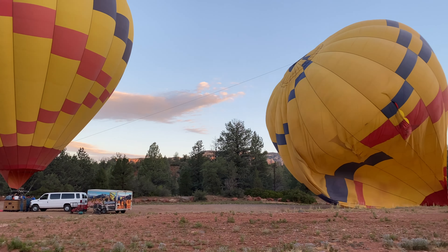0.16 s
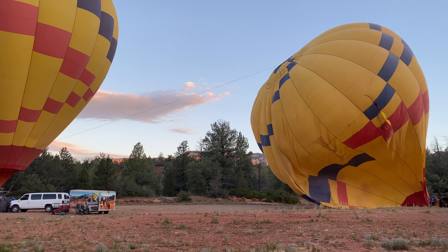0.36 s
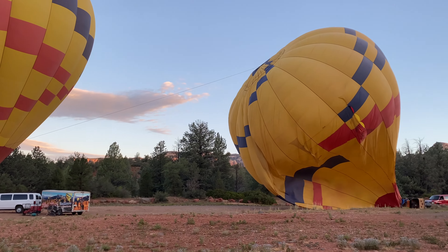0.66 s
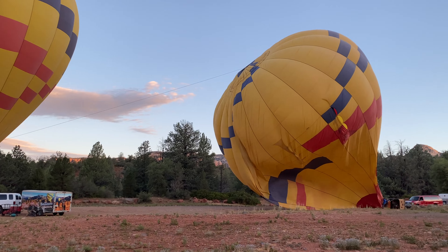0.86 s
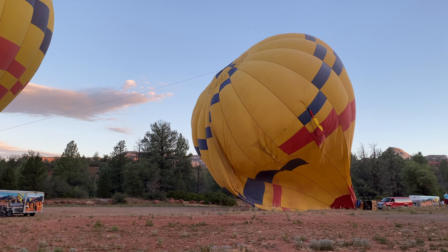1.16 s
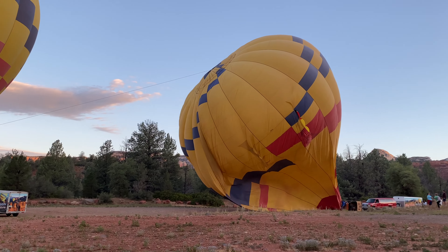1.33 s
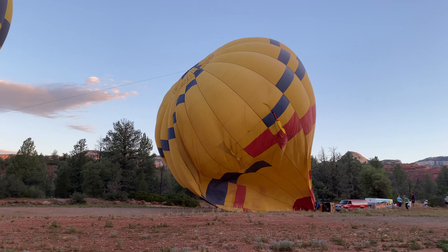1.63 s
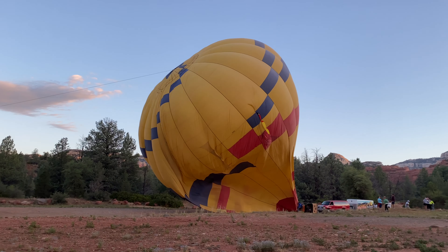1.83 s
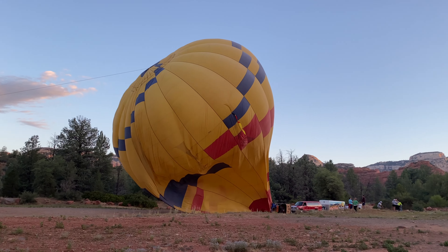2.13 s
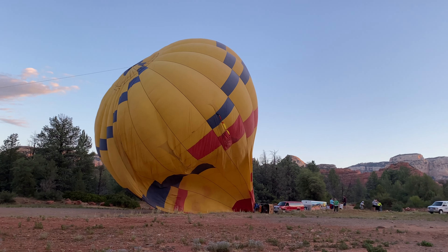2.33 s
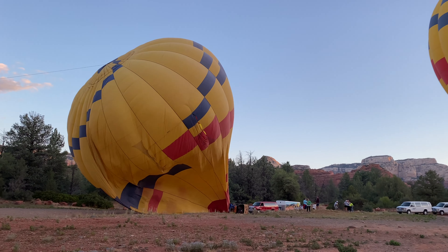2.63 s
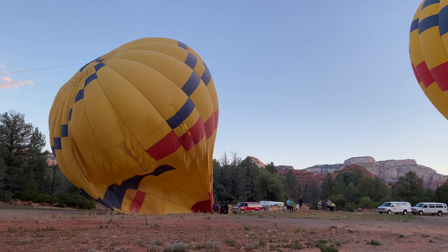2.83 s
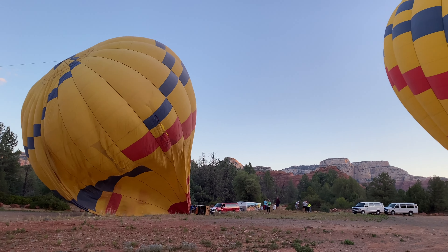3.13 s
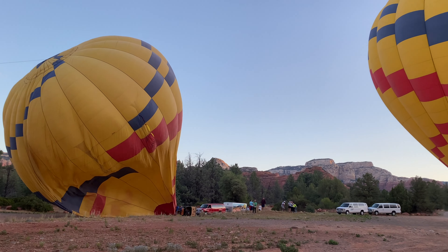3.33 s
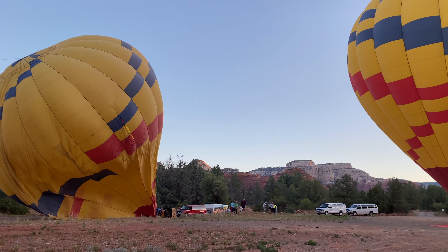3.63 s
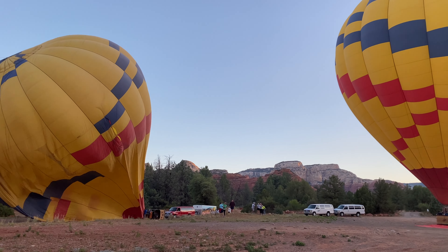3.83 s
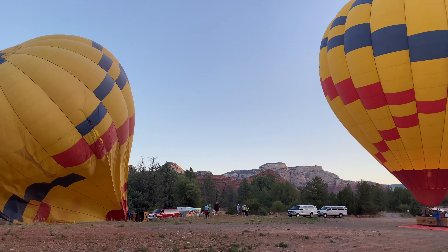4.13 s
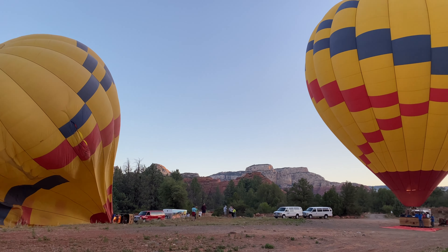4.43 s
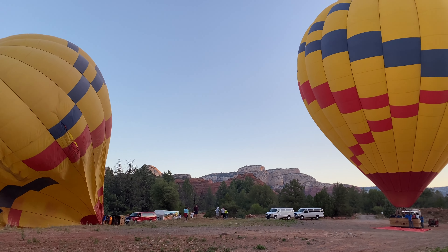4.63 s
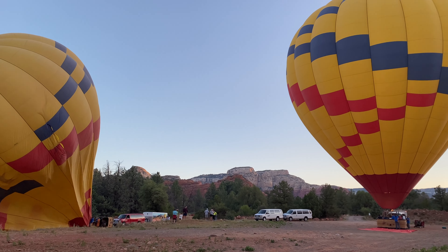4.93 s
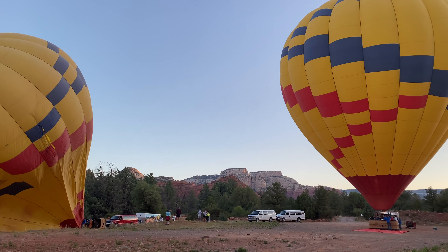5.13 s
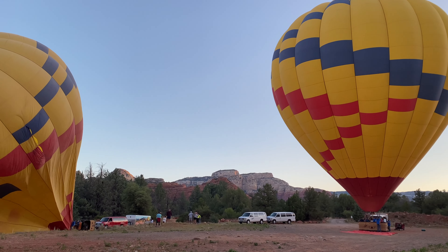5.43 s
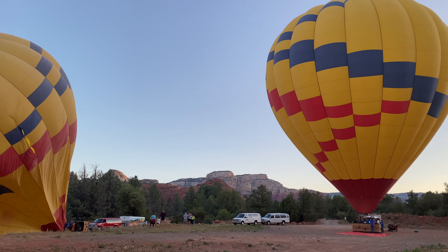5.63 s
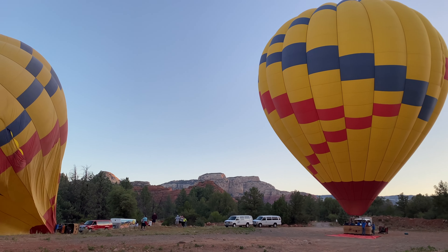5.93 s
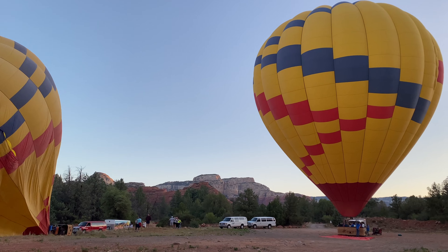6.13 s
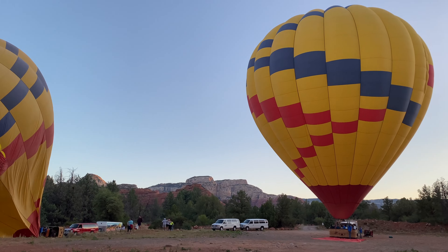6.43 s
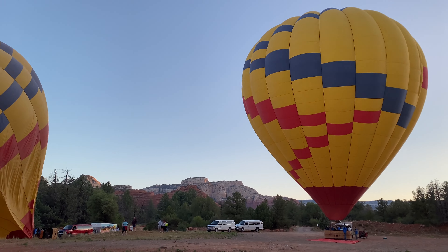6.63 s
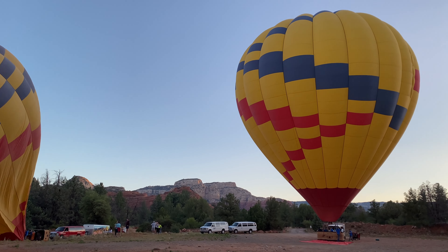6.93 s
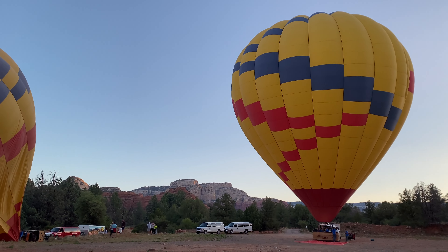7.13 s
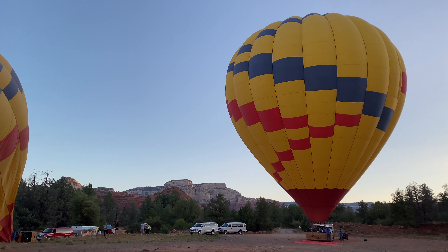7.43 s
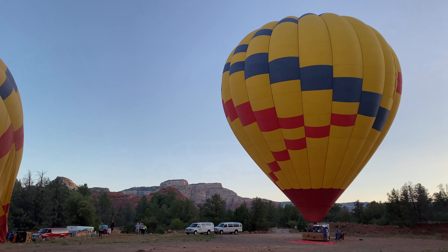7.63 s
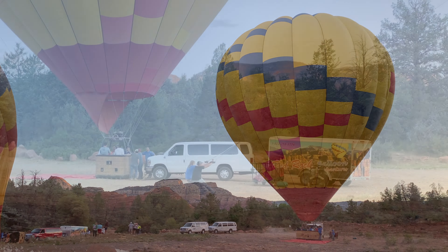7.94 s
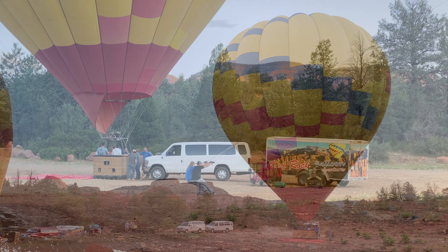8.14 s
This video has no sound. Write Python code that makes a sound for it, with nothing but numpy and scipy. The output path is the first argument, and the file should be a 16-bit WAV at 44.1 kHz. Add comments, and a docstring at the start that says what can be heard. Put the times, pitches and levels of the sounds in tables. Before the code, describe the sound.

On an open field, a small one-cylinder petrol engine throbs steadily while its inflator fan hums over rushing air. After a bit over two seconds a propane burner fires a brief deep blast, then almost at once a long one with heavy thumps, fluttering roar and hiss, easing slowly. Heard in stereo from a slowly turning camera; the sound fades at the end.

```python
"""A one-cylinder petrol engine throbs and its three-blade inflator fan hums over rushing air.
A propane burner then gives a short blast and a long one, joined for a while by a second valve.
The flame is level-evened deep noise with single thumps; the jet is a fluttering roar that eases and a
hiss whose top dulls. Engine and fan are sums of tones at multiples of their rates; the fan adds chopped noise.
Balloons are being filled on an open field, heard by a slowly turning stereo camera."""
import sys
import numpy as np
from scipy import signal
from scipy.fft import rfft, irfft
from scipy.io import wavfile
from scipy.ndimage import uniform_filter1d

SR = 44100
rng = np.random.default_rng(int(sys.argv[2]) if len(sys.argv) > 2 else 0)


def master(y):
    """Save y as 16-bit WAV."""
    cut = np.clip(np.atleast_2d(y).T, -1, 1)
    pcm = np.round(cut * 32767)  # scale
    wavfile.write(sys.argv[1], SR, pcm.astype(np.int16))


N = 364707
TIME_S = np.arange(N) / SR

# burner blasts, last row the second valve: (opens [s], shuts [s], rumble [dB], roar [dB], hiss [dB])
BLASTS = [(2.312, 3.25, -27, -41.5, -41), (3.29, 8.3, -28.5, -39.5, -41), (4.37, 5.7, -29, -38.5, -64)]
# single large puffs of burning gas: (time [s], peak level [dB])
FLAME_PUFFS = [(2.333, -23), (2.354, -14.5), (2.418, -14.5), (2.716, -18), (2.777, -17.5), (2.937, -23),
               (3.359, -9.5), (3.43, -14), (3.6, -18), (3.779, -20), (4.052, -22), (4.195, -19),
               (4.417, -11.5), (4.486, -16.5), (4.721, -19), (4.777, -18), (4.845, -18), (4.9, -19),
               (5.071, -15.5), (5.117, -19), (5.291, -13), (5.513, -18), (5.784, -20), (5.835, -19),
               (5.95, -17.5), (6.009, -16.5), (6.637, -22), (6.721, -18.5), (7.304, -17.5), (7.364, -20),
               (7.597, -19.5)]
# surging of the flame: (time [s], rumble gain [dB])
FLAME_SURGE = [(2.5, -1), (2.75, -0.5), (2.92, 0), (3.17, -1), (3.4, -1.5), (3.62, 1.5), (3.87, 0.5),
               (4.25, 2), (4.58, 0), (4.8, 2), (5.15, 0.5), (5.4, -1), (5.6, 0), (6.03, 2), (6.25, -0.5),
               (6.9, 0), (7.37, 0.5), (7.7, 0.5), (8.1, 3)]
# relative noise spectrum of the flame: (frequency [Hz], density [dB])
RUMBLE_SPECTRUM = [(20, -16), (30, -15), (45, -8.5), (62, 0.5), (85, -1), (120, -2.5), (178, -3.5),
                   (210, -6.5), (250, -11.5), (295, -11), (340, -15), (450, -23.5), (900, -49.5)]
# relative noise spectrum of the jet's roar: (frequency [Hz], density [dB])
ROAR_SPECTRUM = [(200, -9.5), (450, -1), (700, -0.5), (1100, -1.5), (1600, -9.5), (2400, -12.5),
                 (4000, -29)]
# relative noise spectrum of the jet's hiss: (frequency [Hz], density [dB])
HISS_SPECTRUM = [(1200, 4), (2200, -0.5), (3200, 5), (4000, 5.5), (5000, 6.5), (5800, 5.5), (6600, 4.5),
                 (7500, 3), (9000, 0.5), (10500, -2.5), (12000, -4), (14000, -7)]
# relative exhaust orders: (multiple of the firing rate, level [dB])
EXHAUST_ORDERS = [(1, -41), (2, -17), (3, -15), (4, -5.5), (5, -10), (6, -3), (7, 0), (8, -6), (9, -13),
                  (10, -19), (11, -25), (12, -8.5), (13, -5), (14, -13), (15, -22.5), (16, -35), (17, -20),
                  (19, -25)]
# strongest fan tones, swelling and sinking in level: (time [s], 3rd [dB], 4th [dB], 5th [dB], 6th multiple of
# the blade rate [dB])
FAN_HUM = [(0.0, -52, -54, -67, -51), (0.35, -48, -52, -49.5, -50), (0.65, -48.5, -49.5, -52.5, -45.5),
           (1.15, -50, -51, -54, -53.5), (1.35, -51, -57, -52.5, -46.5), (1.65, -50.5, -56, -48, -53.0),
           (1.9, -52, -55.0, -56.0, -47.5), (2.1, -61, -50.5, -50.5, -64), (2.85, -53, -50, -49.5, -49),
           (3.05, -52.5, -58, -45.5, -56), (3.35, -50, -47.5, -57, -44.5), (3.5, -50, -52, -48, -47),
           (4.1, -54.5, -58.5, -57, -56), (4.3, -55.5, -50.5, -62, -58), (4.5, -58, -51, -58, -44),
           (4.75, -54, -47, -51.5, -57.5), (5.0, -45, -58.0, -50, -54.5), (5.15, -53, -56.0, -55, -44),
           (5.4, -51.5, -55, -59, -55.5), (5.55, -52, -46, -46, -44.5), (5.9, -49.0, -51, -51.5, -46),
           (6.1, -54, -46, -46, -54), (6.6, -49, -47.5, -48, -46), (6.8, -52, -48, -50, -57),
           (7.2, -53, -49, -44.5, -44), (7.55, -50.5, -50.5, -44.5, -48), (7.7, -51.0, -47, -55, -53),
           (7.9, -52.5, -56, -49, -48), (8.05, -53, -47.5, -58, -56), (8.25, -56, -48, -48, -58.5)]
# upper fan tones: (multiple of the blade rate, level before the FAN_TURN gain [dB])
UPPER_FAN_TONES = [(7, -67.5), (8, -56.7), (9, -56.5), (10, -60), (11, -58), (12, -66)]
# fan as heard from the turning camera: (time [s], upper tone gain [dB], wash gain [dB])
FAN_TURN = [(0, 0, 0), (1, 2.5, -1), (2.1, 1.5, -0.5), (3, 3.5, -3), (4, 4.5, -3.5), (5.5, 6, -2),
            (6.6, 7.5, -2.5), (7.3, 8, -2.5), (8.1, 2, -1.5)]
# relative noise spectrum of the churned air: (frequency [Hz], density [dB])
WASH_SPECTRUM = [(30, -16), (80, -5), (160, -6.5), (300, -6), (450, -9), (700, -8.5), (1000, -9.5),
                 (1500, -6.5), (2200, -3.5), (3200, -13.5), (4500, -13.5), (6500, -15.5), (9000, -20),
                 (12000, -25), (14000, -30)]
# likeness of the two microphones: (frequency [Hz], coherence [0..1])
MIC_LIKENESS = [(100, 1), (270, 0.92), (600, 0.079), (1300, 0.42), (2500, 0.47), (5000, 0.82), (7000, 0.31),
                (12000, 0.037)]
# camera body shadow, sound on its right: (frequency [Hz], left minus right [dB])
SHADOW_RIGHT = [(100, -1.8), (400, -3), (850, -7), (2100, -2.5), (3200, 5), (4500, -5), (5800, -1.5),
                (6800, -5), (8500, 0)]
# camera body shadow, sound on its left: (frequency [Hz], left minus right [dB])
SHADOW_LEFT = [(100, -1), (400, -.5), (850, 2.5), (1900, -2.5), (3100, 10), (4300, 0.5), (5800, -4.5),
               (7500, 0.5), (8500, 0)]
# tone colour of the sum of the two channels, peaks and dips: (frequency [Hz], gain [dB])
SUM_COLOUR = [(3000, 0.5), (3900, -0.5), (4550, 1), (5100, 1.5), (5500, -4), (5850, -1), (6350, 2),
              (6800, 1.5), (7500, 0.5), (8250, -16.5), (9200, 0), (10500, 2.5), (12300, 0.5), (12900, -26)]
# tone colour of the difference of the two channels, peaks and dips: (frequency [Hz], gain [dB])
DIFFERENCE_COLOUR = [(500, 0), (1100, -1.5), (1800, 2), (2500, -5), (3500, 1.5), (4450, -4.5), (5800, 4.5),
                     (6700, -6), (7600, 1.5), (8500, 4), (9700, 0), (11000, -16), (12200, 0), (13300, 1.5)]
# closing fade: (time [s], gain [dB])
END_FADE = [(7.85, 0), (8.27, -7)]

# first-rush offset (negative: starts weak) decays with FLARE_S; slopes run from the valve's opening
FLARE_S = 0.3
RUMBLE_RISE_S, RUMBLE_FLARE_DB, RUMBLE_SLOPE_DB_PER_S = 0.0089, 1.5, -0.37
ROAR_RISE_S, ROAR_FLARE_DB, ROAR_SLOPE_DB_PER_S = 0.12, -1.5, -0.92
HISS_RISE_S, HISS_FLARE_DB, HISS_SLOPE_DB_PER_S = 0.19, -1.5, 0.3
RELEASE_DB_PER_S = 26  # added to the slope once the valve shuts
DULL_FROM_S, DULL_DB_PER_S = 3.53, 4.5  # top of the hiss

FIRING_HZ, EXHAUST_DB = 23.54, -32.5
EXHAUST_FADE_DB_PER_S = 0.7  # low throb only, once the camera turns away
WASH_DB = -38

# FACING_S: camera faces the sound; PORT_MS: delay between microphones for sound from the side
TURN_DEG_PER_S, FACING_S, PORT_MS = 17.6, 2.26, 0.22
BAND_EDGE_HZ = 14000


def amp(db):
    """Decibels to gain."""
    return 10 ** (np.asarray(db) / 20)


def unit(x):
    """Scales to rms 1."""
    return x / np.sqrt(np.mean(x ** 2) + 1e-20)


def curve(rows):
    """Columns of a time table, joined by straight lines."""
    s, *columns = np.transpose(rows)
    return [np.interp(TIME_S, s, column) for column in columns]


def colour(points, hz):
    """Reads a spectrum on a log-frequency axis."""
    f, value = np.transpose(points)
    return np.interp(np.log(hz + 1), np.log(f), value)


def drift(top_hz):
    """Random motion of rms 1: twenty sines no faster than top_hz."""
    t = np.arange(0, N / SR + .01, .004)
    rates_hz = top_hz * rng.uniform(0.0987, 1, 20)
    waves = sum(np.sin(2 * np.pi * (hz * t + rng.random())) for hz in rates_hz)
    return np.interp(TIME_S, t, unit(waves))


def spectra(x, size):
    """Short-time spectra: Hz, s, (channel, bin, frame)."""
    return signal.stft(x, SR, nperseg=size, noverlap=size * 3 // 4)


def waveform(z, size):
    """Short-time spectra back to sound."""
    return signal.istft(z, SR, nperseg=size, noverlap=size * 3 // 4)[1][..., :N]


def turbulence(points, patchy_db, size):
    """Coloured noise with drifting eddies, partly alike at the two microphones."""
    hz, _, (a, b, grid) = spectra(rng.standard_normal((3, N)), size)
    eddies = uniform_filter1d(rng.standard_normal(grid.shape), size=14, axis=0)
    eddies = unit(uniform_filter1d(eddies, size=10, axis=1))
    same = np.clip(colour(MIC_LIKENESS, hz), 0, 1)[:, None]
    pair = np.array([a, same * a + np.sqrt(1 - same ** 2) * b])
    level_db = colour(points, hz)[:, None] + patchy_db * eddies
    return unit(waveform(pair * amp(level_db), size))


def blasts(levels_db, rise_s, flare_db, slope_db_per_s):
    """Gain of one burner part: each blast rises, settles, drifts and dies away; powers add."""
    power = np.zeros(N)
    for (opens_s, shuts_s, *_), db in zip(BLASTS, levels_db):
        age_s = np.maximum(TIME_S - opens_s, 0)
        shut_for_s = np.maximum(TIME_S - shuts_s, 0)
        level_db = db + flare_db * np.exp(-age_s / FLARE_S) + slope_db_per_s * age_s
        level_db -= RELEASE_DB_PER_S * shut_for_s
        power += (np.minimum(age_s / rise_s, 1) * amp(level_db)) ** 2
    return np.sqrt(power)


def flame(puff_hz=90, typical_puff_db=-14, db_per_octave=16, puff_spread=0.12, buffet_db=1.5):
    """Burning gas billows into a deep rumble; big pockets flare as single thumps."""
    rumble_db = np.transpose(BLASTS)[2]
    rumble = turbulence(RUMBLE_SPECTRUM, patchy_db=2.0, size=4096) * amp(buffet_db * drift(22))
    # even out the noise level over about a tenth of a second
    local_power = uniform_filter1d(rumble[0] ** 2, size=4000, mode="reflect")
    rumble /= np.sqrt(local_power + 1e-9)
    gain = blasts(rumble_db, RUMBLE_RISE_S, RUMBLE_FLARE_DB, RUMBLE_SLOPE_DB_PER_S)
    out = rumble * gain * amp(curve(FLAME_SURGE)[0])
    for s, db in FLAME_PUFFS:
        near = abs(TIME_S - s) < .03
        # smaller pockets flare faster, so they sound higher
        octaves_up = max(typical_puff_db - db, 0) / db_per_octave
        hz = puff_hz * 2 ** octaves_up * np.exp(puff_spread * rng.standard_normal())
        u = (np.pi * hz * (TIME_S[near] - s)) ** 2
        out[:, near] -= amp(db) * (1 - 2 * u) * np.exp(-u)
    return out


def jet(flutter_db=1.8, sizzle_db=0.6, top_hz=6100):
    """Propane leaving the nozzles: a fluttering roar and a hiss whose top dulls."""
    roar_db, hiss_db = np.transpose(BLASTS)[3:]
    roar = turbulence(ROAR_SPECTRUM, patchy_db=0.86, size=1024) * amp(flutter_db * drift(40))
    hiss = turbulence(HISS_SPECTRUM, patchy_db=1.1, size=512) * amp(sizzle_db * drift(50))
    low_pass = signal.butter(3, top_hz, fs=SR, output="sos")
    body = signal.sosfiltfilt(low_pass, hiss)
    top_db = -DULL_DB_PER_S * np.maximum(TIME_S - DULL_FROM_S, 0)
    hiss = body + (hiss - body) * amp(top_db)
    roar_gain = blasts(roar_db, ROAR_RISE_S, ROAR_FLARE_DB, ROAR_SLOPE_DB_PER_S)
    hiss_gain = blasts(hiss_db, HISS_RISE_S, HISS_FLARE_DB, HISS_SLOPE_DB_PER_S)
    return roar * roar_gain + hiss * hiss_gain


def engine(cycles, buzz_db=-34.5, dispersion=.69):
    """One exhaust puff a cycle, smeared into a throb because higher orders come out later."""
    # faint buzz above the muffler's resonances
    buzz = [(k, buzz_db + 2 * rng.standard_normal()) for k in range(20, 60) if k % 6]
    orders = list(EXHAUST_ORDERS) + buzz
    crank = np.linspace(0, 1, 4097)  # one cycle
    waves = [-amp(db) * np.cos(2 * np.pi * k * crank - np.pi * dispersion * k ** 2) for k, db in orders]
    throb = np.interp(cycles % 1, crank, sum(waves[:10]))
    drone = np.interp(cycles % 1, crank, sum(waves[10:]))
    fade_db = -EXHAUST_FADE_DB_PER_S * np.maximum(TIME_S - FACING_S, 0)
    return amp(EXHAUST_DB) * (throb * amp(fade_db) + drone) / np.std(throb + drone)


def fan(cycles, waver_db=2.5, hum_waver_db=.5, smear_rad=0.35, side_smear_rad=0.29, lurch_rad=0.071,
        pulsing=0.15, blade_chop=0.049, firing_chop=0.15):
    """Three blades, two turns a firing: tones wavering in the moving air over a chopped wash."""
    tones_db, wash_db = curve(FAN_TURN)
    firing = 2 * np.pi * cycles
    # shaft slows on compression, leaps on firing: tones pulse in pitch and level, giving sidebands
    passes = 6 * firing + lurch_rad * np.sin(firing)
    hum = [(k, db + hum_waver_db * drift(3.5)) for k, db in zip((3, 4, 5, 6), curve(FAN_HUM))]
    upper = [(k, db + tones_db + waver_db * drift(3.2)) for k, db in UPPER_FAN_TONES]
    tones = np.zeros((2, N))
    for k, db in hum + upper:
        phase = k * passes + smear_rad * drift(5) + 2 * np.pi * rng.random()
        level = np.sqrt(2) * amp(db) * (1 - pulsing * np.cos(firing))
        tones += [level * np.cos(phase + side_smear_rad * drift(1.5)) for side in range(2)]
    beat = np.cos(firing) + np.cos(2 * firing)
    chop = (1 + blade_chop * np.cos(passes)) * (1 + firing_chop * beat / 2)
    wash = turbulence(WASH_SPECTRUM, patchy_db=1, size=1024)
    return tones + amp(WASH_DB + wash_db) * chop * wash


def microphones(x, facing_db=3, facing_hz=4700, facing_ms=0.019, detour_ms=0.17, detour_share=0.51):
    """Bearing sets the delay between ports, the body's shadow and a lift when facing the sound."""
    hz, t, z = spectra(x, size=1024)
    lead_ms = PORT_MS * np.sin(np.radians(TURN_DEG_PER_S * (t - FACING_S)))
    turned = np.clip(lead_ms / lead_ms.max(), 0, 1)
    shade_db = np.outer(colour(SHADOW_RIGHT, hz), 1 - turned) + np.outer(colour(SHADOW_LEFT, hz), turned)
    lift_band = np.exp(-(np.log2((hz + 1) / facing_hz) / .5) ** 2)
    lift_db = facing_db * np.outer(lift_band, np.exp(-(lead_ms / facing_ms) ** 2))
    shade = amp(np.array([1, -1])[:, None, None] / 2 * shade_db)
    shade /= np.sqrt(np.mean(shade ** 2, axis=0))
    radians_per_ms = 2 * np.pi * hz[:, None] / 1000
    # turning away sends more sound round the body to the right port; only its phase shift is used
    share = detour_share * turned
    detour = np.angle(1 - share + share * np.exp(1j * radians_per_ms * detour_ms))
    right = z[1] * np.exp(-1j * (radians_per_ms * lead_ms + detour))
    return waveform(np.array([z[0], right]) * amp(lift_db) * shade, size=1024)


def colour_sum_and_difference(x):
    """Tone colour of the sum and difference of the two channels: peaks and dips."""
    hz = np.fft.rfftfreq(N, 1 / SR)
    mid = irfft(rfft(x[0] + x[1]) / 2 * amp(colour(SUM_COLOUR, hz)), N)
    side = irfft(rfft(x[0] - x[1]) / 2 * amp(colour(DIFFERENCE_COLOUR, hz)), N)
    return np.array([mid + side, mid - side])


def scene():
    """Burner, engine and fan at the microphones; firing rate wanders by 0.12 % rms."""
    cycles = np.cumsum(FIRING_HZ * (1 + .0012 * drift(2))) / SR
    return microphones(flame() + jet() + engine(cycles) + fan(cycles))


def record(dry, low_cut_hz=36):
    """Sum and difference colour, low cut, closing fade and band limit."""
    high_pass = signal.butter(3, low_cut_hz, "highpass", fs=SR, output="sos")
    cut = signal.sosfiltfilt(high_pass, colour_sum_and_difference(dry))
    faded = cut * amp(curve(END_FADE)[0])
    edge = signal.firwin(511, BAND_EDGE_HZ, window=("kaiser", 9), fs=SR)
    return signal.oaconvolve(faded, edge[None], "same", axes=1)


dry = scene()
out = record(dry)
master(out)
```